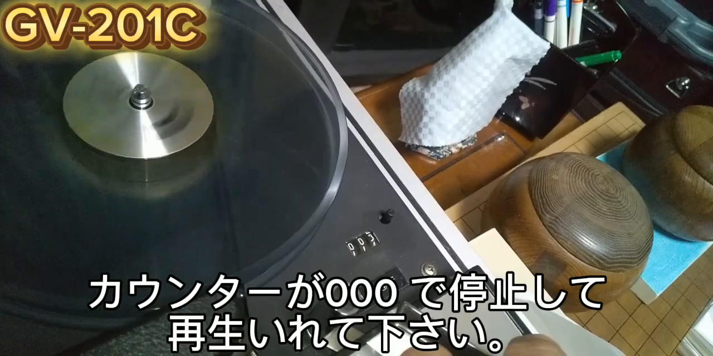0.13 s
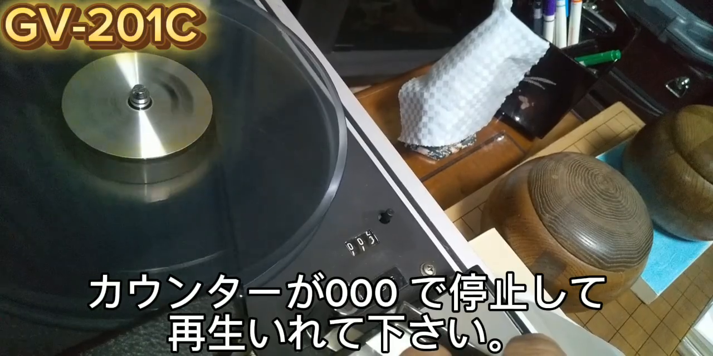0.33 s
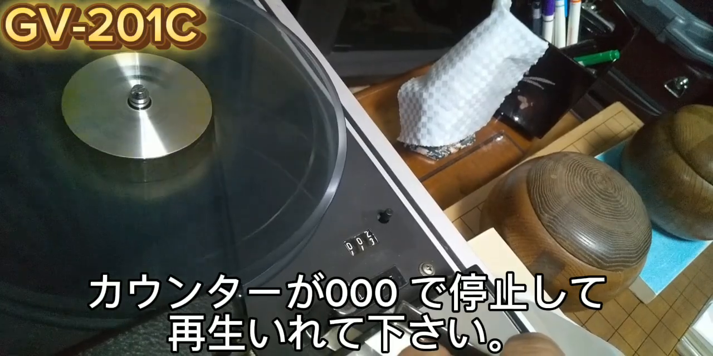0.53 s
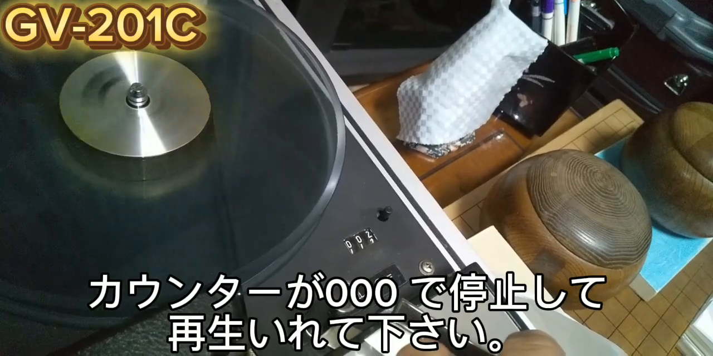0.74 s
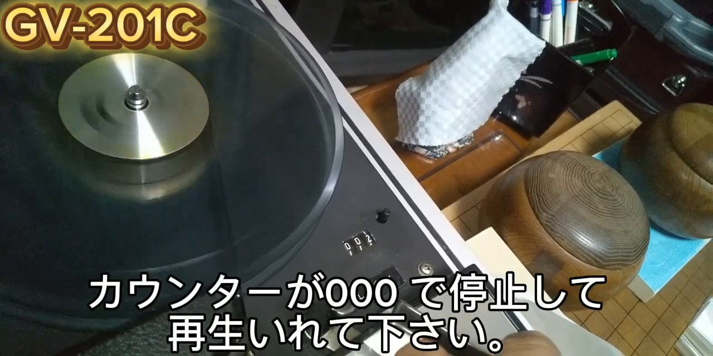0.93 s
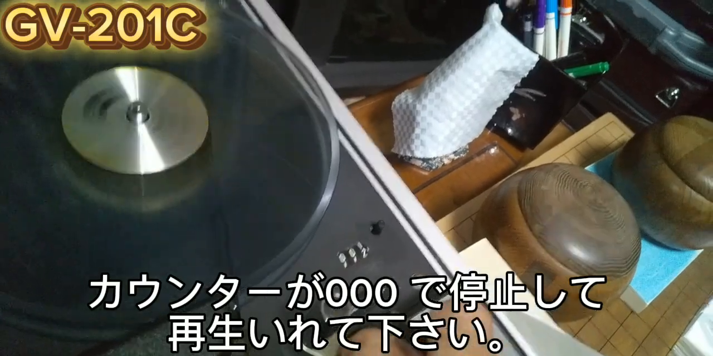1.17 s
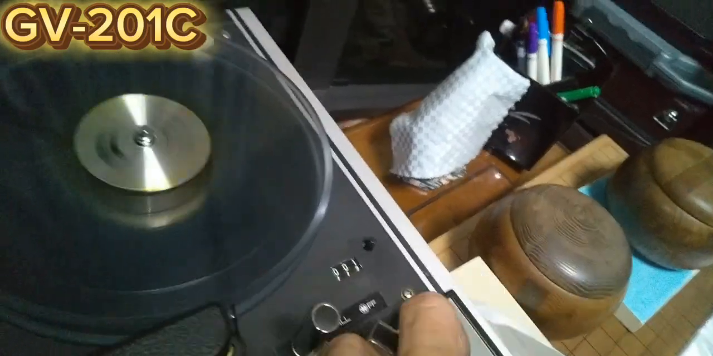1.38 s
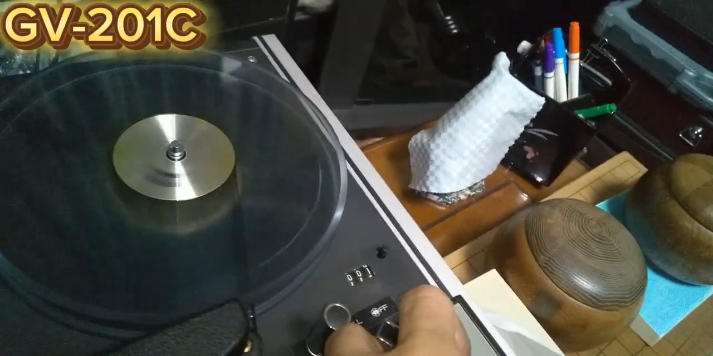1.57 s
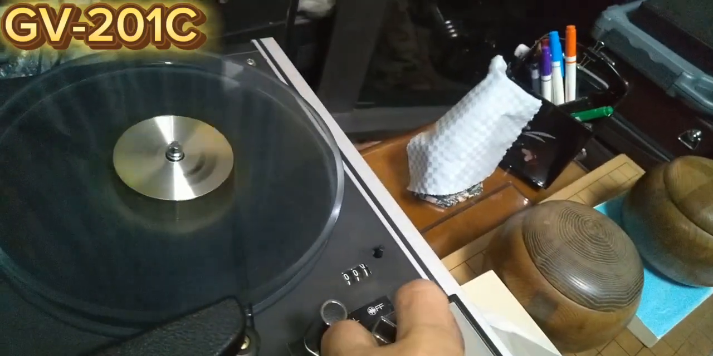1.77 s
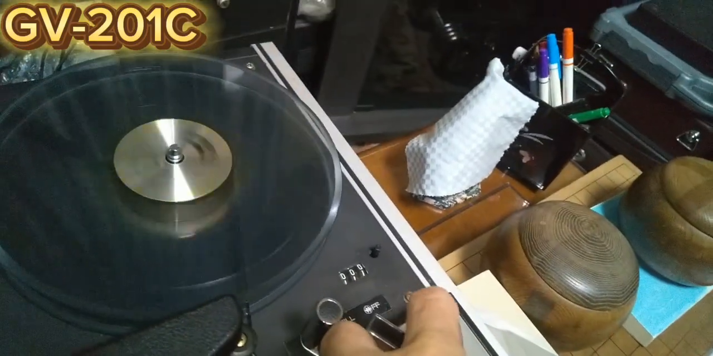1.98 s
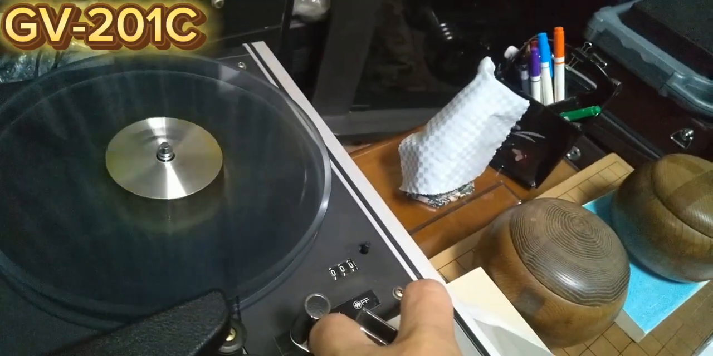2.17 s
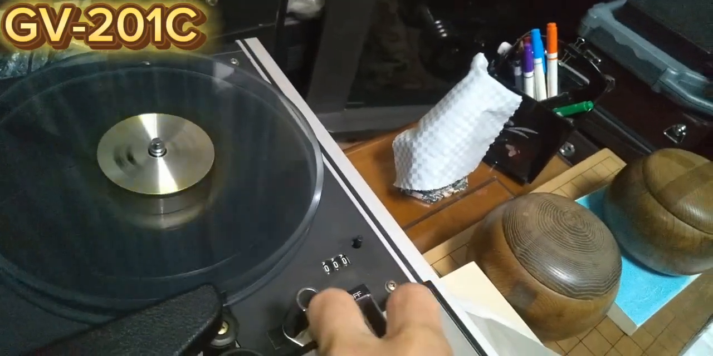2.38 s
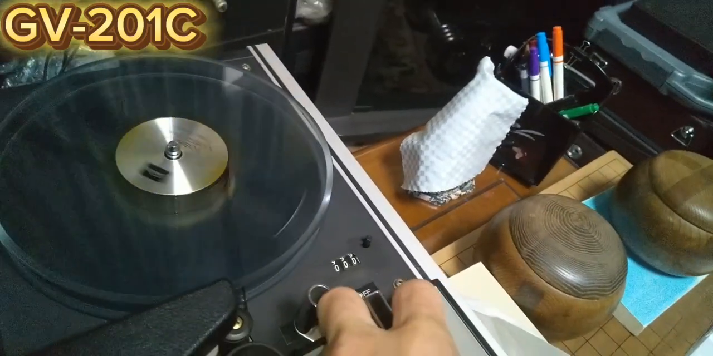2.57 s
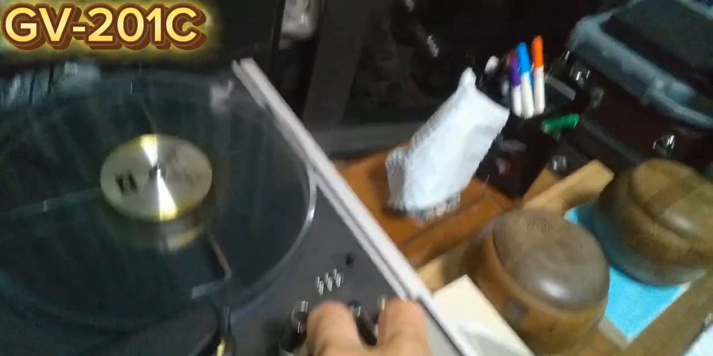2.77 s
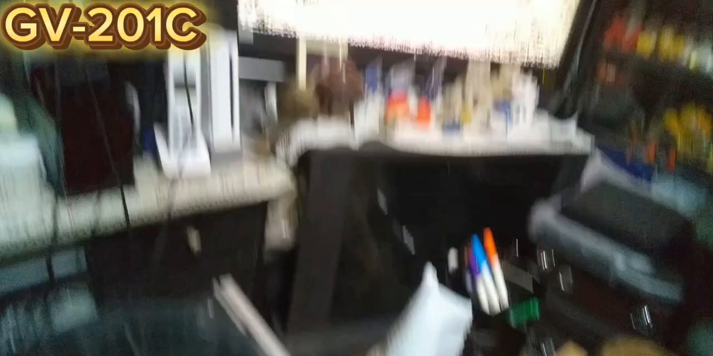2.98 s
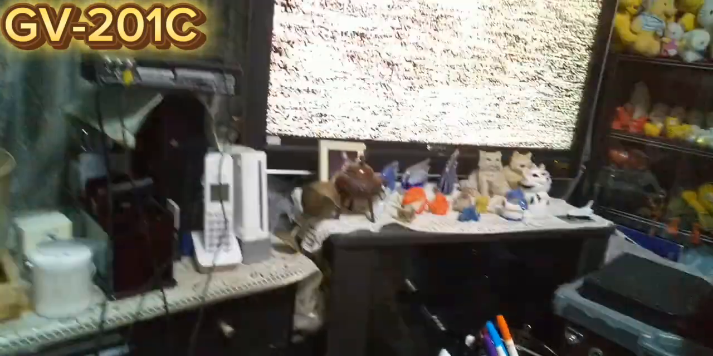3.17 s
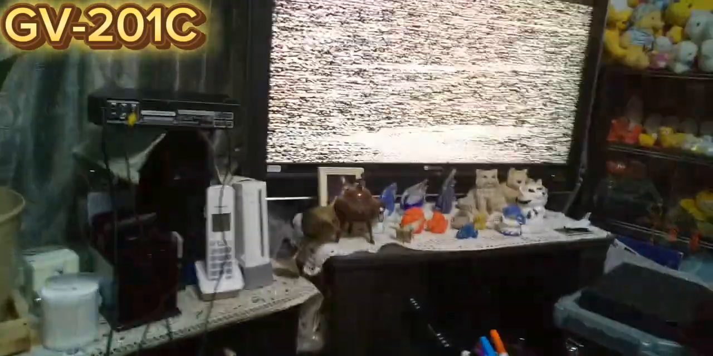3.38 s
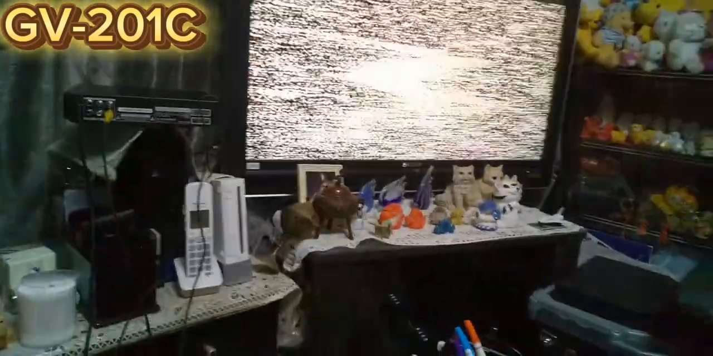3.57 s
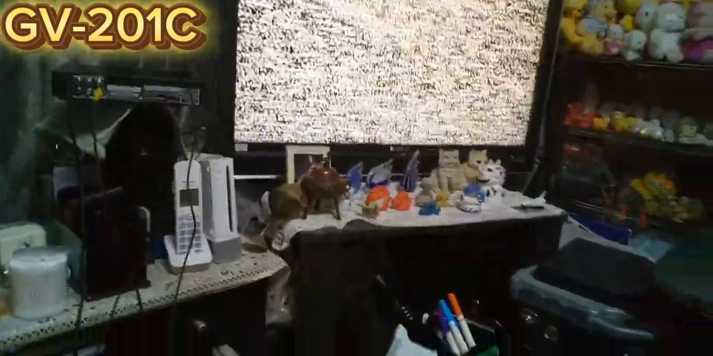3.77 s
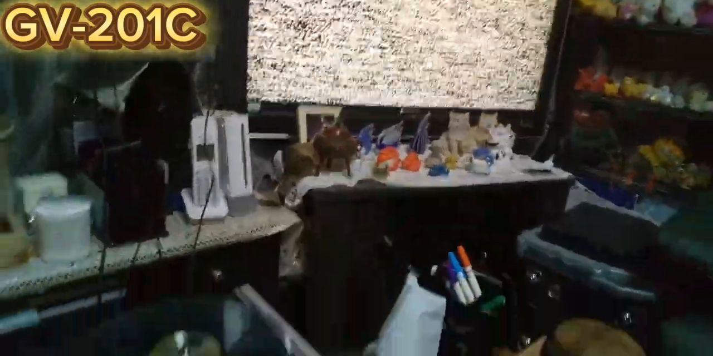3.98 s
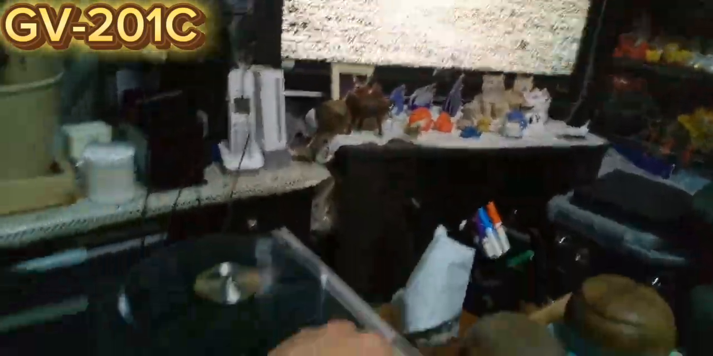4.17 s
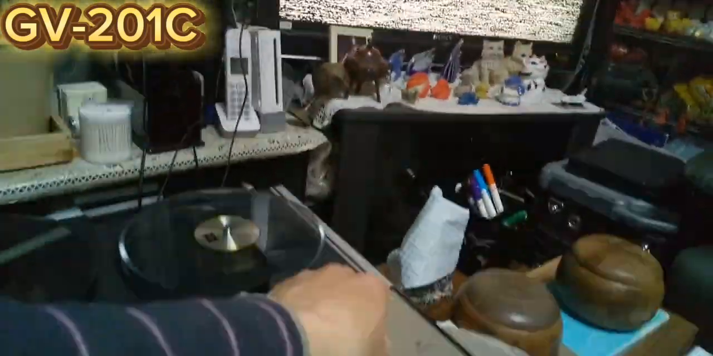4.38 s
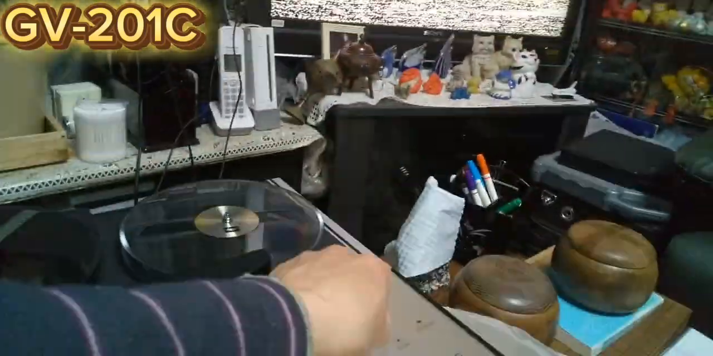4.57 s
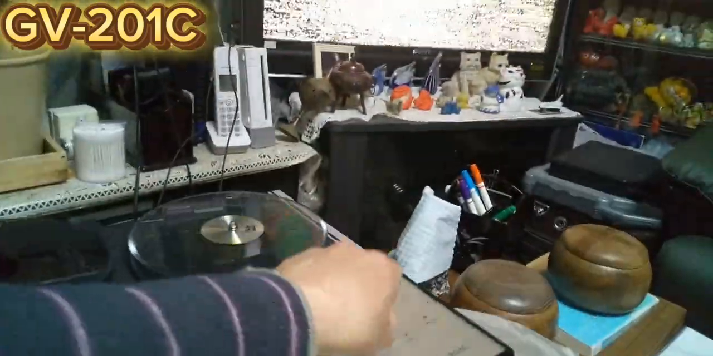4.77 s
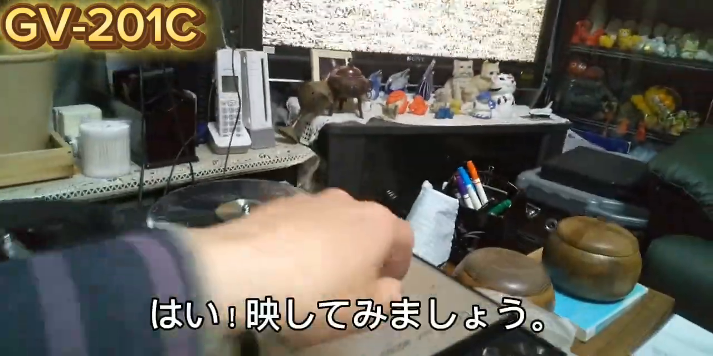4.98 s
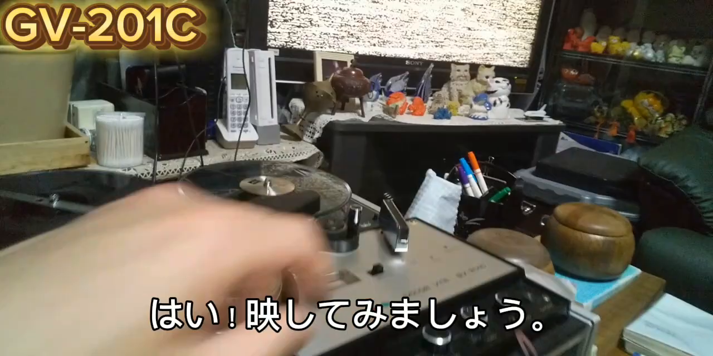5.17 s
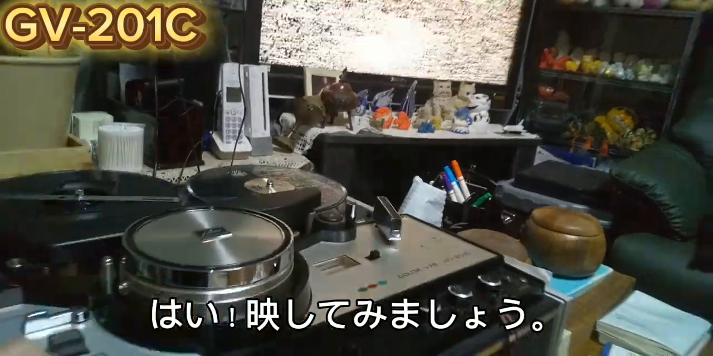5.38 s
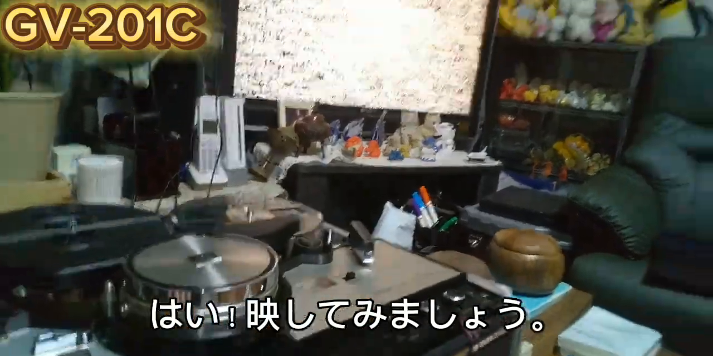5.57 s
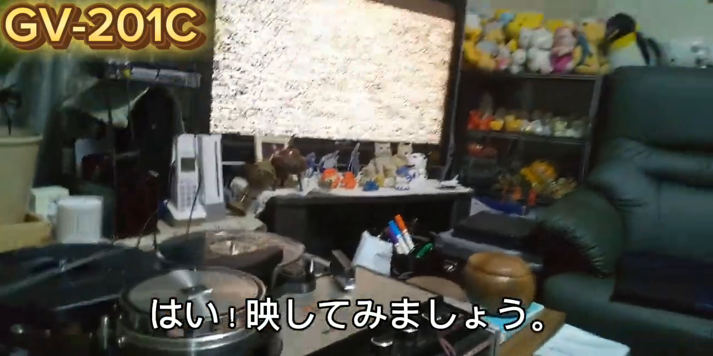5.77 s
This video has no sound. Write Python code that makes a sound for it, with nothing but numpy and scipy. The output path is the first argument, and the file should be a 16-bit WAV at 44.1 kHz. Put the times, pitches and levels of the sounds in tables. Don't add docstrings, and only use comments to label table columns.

```python
import sys
import numpy as np
from scipy import signal
from scipy.fft import rfft, irfft
from scipy.io import wavfile
from scipy.ndimage import uniform_filter1d

SR = 44100
rng = np.random.default_rng(int(sys.argv[2]) if len(sys.argv) > 2 else 0)


def rack_gain(trim_db):
    fader = np.asarray(trim_db, float)
    return 10 ** (fader / 20)


def file_out(sig):
    cols = np.atleast_2d(sig).T
    lim = np.clip(cols, -1, 1)
    pcm = np.round(lim * 32767).astype(np.int16)
    wavfile.write(sys.argv[1], SR, pcm)


N = 257103
T, HZ = np.arange(N) / SR, np.fft.rfftfreq(N, 1 / SR)

# freq_hz, width_hz, lift_db
PLAY_RINGS = [(214, 25, 4), (830, 50, 3), (1230, 70, 4), (1520, 90, 5), (1850, 100, 3), (2400, 200, 3),
              (3550, 200, 6), (5000, 300, 3), (6000, 400, 3), (7050, 500, 4)]


def rewind_whir(pulley):
    # rumble_db, body_db, bearings_db, hiss_db
    state = (0.45, 2.5), (-51.5, -42.5, -54, -61.5), (-51, -45.5, -56.5, -59)
    # freq_hz, density_db
    colour = [(18, -37), (30, -8.5), (86, -9), (131, -13), (156, -23), (178, -15.5), (283, -13), (406, -22),
              (736, -6.5), (1000, -13.5), (1550, -11), (1860, -13), (2670, -16), (5650, -23.5),
              (14300, -21)]
    # freq_hz, width_hz, lift_db
    rings = [(290, 40, 4), (640, 50, 4), (1600, 130, 5), (2080, 120, 2), (2380, 100, 3), (2700, 130, 6),
             (3110, 110, 7), (3450, 130, 6), (4000, 200, 4), (4900, 300, 3), (6960, 450, 5)]
    # rumble_db, body_db, bearings_db, hiss_db
    knock_db = (-22, -2.5, -2.5, -11)
    return whir(state, colour, rings, pulley, knock_db, fade_s=[-1, 0, 2.38, 2.45])


def stop_whir(drum):
    # rumble_db, body_db, bearings_db, hiss_db
    state = (2.57, 2.85), (-45.5, -47, -54, -67), (-55, -52, -66.5, -74)
    # freq_hz, density_db
    colour = [(18, -60), (30, -19), (60, -18), (134, -18.5), (219, -29), (291, -16.5), (450, -27.5),
              (760, -12.5), (1000, -21.5), (1600, -20), (2060, -27.5), (3640, -32), (5500, -43),
              (7500, -45), (8300, -52), (14300, -50)]
    # rumble_db, body_db, bearings_db, hiss_db
    knock_db = (-25, -8, -2, -7)
    slip_turns, drum_hz = .53, 26.67
    early = np.roll(drum, -int(slip_turns * SR / drum_hz))
    emerging = early * np.interp(T, state[0], [.1, 1])
    return whir(state, colour, PLAY_RINGS, emerging, knock_db, fade_s=[2.38, 2.45, 3.42, 3.5])


def play_whir(drum):
    # rumble_db, body_db, bearings_db, hiss_db
    state = (4, 5.67), (-52.5, -54, -60, -69), (-56.5, -56, -63.5, -73)
    # freq_hz, density_db
    colour = [(18, -59), (30, -20), (54, -5), (183, -11.5), (208, -13.5), (236, -17), (306, -5.5),
              (439, -19), (663, -18), (736, -13.5), (904, -21.5), (1550, -21), (1680, -24), (7120, -36),
              (14300, -36.5)]
    # rumble_db, body_db, bearings_db, hiss_db
    knock_db = (-20, -8, -10.5, -9)
    return whir(state, colour, PLAY_RINGS, drum, knock_db, fade_s=[3.42, 3.5, 6, 7])


def whir(state, colour, rings, knocks, knock_db, fade_s):
    # low_hz, high_hz
    bands = [(30, 500), (900, 4500), (4500, 8000), (8000, 14200)]
    splits = [520, 4500, 8000]
    lift = rack_gain(sum(db / (1 + (2 * (HZ - hz) / width) ** 2) for hz, width, db in rings))
    gain = shape(HZ, colour) * lift
    span_s, first_db, last_db = state
    drift = np.interp(T, span_s, [0, 1])
    noise = rfft(rng.standard_normal(N)) * gain
    treble = .3 + .5 / (1 + (1900 / (HZ + 1)) ** 4)
    struck = rfft(knocks) * gain * lift * treble
    above = [1] + [1 / (1 + (hz / (HZ + 1)) ** 12) for hz in splits] + [0]
    out = 0
    for k, (low, high) in enumerate(bands):
        mix = noise + rack_gain(knock_db[k]) * struck
        inside = (HZ > low) & (HZ < high)
        rms = np.sqrt(2 * np.sum(np.abs(mix[inside]) ** 2)) / N
        part = irfft(mix * (above[k] - above[k + 1]), N) / rms
        level_db = first_db[k] + drift * (last_db[k] - first_db[k])
        out = out + part * rack_gain(level_db + .6 * walk(9))
    return out * np.sqrt(np.interp(T, fade_s, [0, 1, 1, 0]))


def pulley_knocks():
    # time_s, rate_hz
    speed = [(0, 39.83), (1.5, 39.83), (1.7, 39.3), (2.0, 39), (2.4, 38)]
    rate_hz = np.interp(T, *np.transpose(speed))
    return turns(rate_hz, .6, [0, -20], scatter_db=1.1, ms=1.5, same=.9)


def drum_knocks():
    return turns(26.67, .5, [0, -4], scatter_db=2.2, ms=1.1, same=1.1)


def turns(hz, start, pattern_db, scatter_db, ms, same):
    phase = (start + np.cumsum(hz * np.ones(N)) / SR) * len(pattern_db)
    at = np.flatnonzero(np.diff(np.floor(phase)))
    which = phase[at + 1].astype(int) % len(pattern_db)
    scatter = scatter_db * rng.standard_normal(N // 400)[:len(at)]
    knock = np.zeros(N)
    knock[at] = rack_gain(np.array(pattern_db)[which] + scatter)
    t = T[:1024]
    fade = t * np.exp(-t * 1000 / ms)
    fresh = signal.fftconvolve(knock, fade)[:N] * rng.standard_normal(N)
    repeated = signal.fftconvolve(knock, fade * rng.standard_normal(1024))[:N]
    return unit(fresh + same * repeated)


def motor():
    # time_s, level_db
    whine_level = [(.3, -49), (1.15, -46), (1.8, -44), (2.3, -47.5), (2.5, -52), (2.58, -40), (2.7, -41),
                   (3.15, -44.5), (3.85, -46.5), (4.5, -44), (5.1, -50.5), (5.75, -55.5)]
    # time_s, level_db
    sideband_level = [(0, -59.5), (1.3, -59.5), (1.6, -59), (4.2, -60.5), (4.55, -55.5), (5.05, -55.5),
                      (5.8, -73)]
    # pitch_hz, level_db
    gears = [(951, -62), (1230, -61.5), (1496, -52.5), (1590, -57), (191, -66)]
    # pitch_hz, level_db
    idle = [(214, -62.5), (587, -67.5), (824, -69.5), (1227, -68), (1518, -66.5)]
    load_hz = np.interp(T, [3.1, 3.2, 3.34, 3.42, 3.55], [0, -8, -48, -48, 0])
    beat_hz, first_null_s, depth = 1.485, .12, .82
    turn = np.pi * beat_hz * (T - first_null_s)
    beat = np.hypot(np.sin(turn), (1 - depth) * np.cos(turn))
    whine_db = np.interp(T, *np.transpose(whine_level)) + .1 * load_hz
    sideband_db = np.interp(T, *np.transpose(sideband_level))
    whine = beat * tone(754.3 + load_hz, whine_db, 1.61, 1.0)
    sideband = tone(705.3 + load_hz, sideband_db, 1.7, 2.0)
    rewinding = np.interp(T, [.6, 1.5, 2.2, 2.5], [1.3, 1, .55, 0])
    playing = np.interp(T, [3.4, 3.6], [0, 1])
    out = whine + sideband
    out = out + rewinding * sum(tone(hz, db, 3.5, 3) for hz, db in gears)
    return out + playing * sum(tone(hz, db, 3.5, 3) for hz, db in idle)


def tone(hz, db, wander_hz, flutter_db):
    phase = 2 * np.pi * np.cumsum(hz + wander_hz * walk(15)) / SR
    return np.sqrt(2) * rack_gain(db + flutter_db * walk(11)) * np.sin(phase)


def throw_to_stop():
    # start_s, peak_db, brightness_db, rattle_ms
    blows = [(2.351, -29, 1.5, 9), (2.359, -28, -3, 9), (2.3645, -25, 0, 9.9), (2.3695, -4, 4.5, 3.8),
             (2.373, 1, 1.5, 1.77), (2.377, -2, 2.5, 2.4), (2.3805, 0.5, 0, 2.2), (2.385, -8, 7, 3.6),
             (2.392, -10.5, 0, 5), (2.400, -10, -3, 9.4), (2.407, -13, 0.5, 4.6), (2.412, -10.5, 0, 4),
             (2.421, -15.5, -3.5, 6.5), (2.435, -25, -13, 7.8)]
    # pitch_hz, level_db, t60_s
    modes = [(123, -20, 0.58), (159.7, -6, 0.29), (718, -11, 0.13), (765, 0, 0.2), (878, 0, 0.17),
             (1004, -6.5, 0.16), (1470, -7, 0.22), (2410, -7, .15), (2580, 1, 0.12), (3110, -7, 0.12),
             (3750, -15, 0.08), (4430, -3, 0.086), (7060, -1.5, .06)]
    # freq_hz, density_db
    crack = [(24, -45), (40, -19), (155, 1), (241, -13), (504, -11.5), (614, -4.5), (887, -3.5),
             (1770, -12), (3110, -9), (4730, -16), (6840, -19.5), (8120, -25), (14300, -22)]
    return throw(blows, modes, crack, ring_db=-7.0, gain_db=-1.85)


def throw_to_play():
    # start_s, peak_db, brightness_db, rattle_ms
    blows = [
        (3.393, -37.5, -1, 5.4),
        (3.405, -29.5, -14, 10),
        (3.4125, -17.5, -12, 6.8),
        (3.4165, -5, 2.5, 3.6),
        (3.421, -4.5, 0, 5.1),
        (3.427, -11, -1, 3),
        (3.434, -11, 0, 4.2),
        (3.448, -18.5, -0.5, 8.4),
        (3.459, -21, -9, 6.7),
        (3.479, -38, 2, 8.6),
    ]
    # pitch_hz, level_db, t60_s
    modes = [(153, -8.5, 0.56), (306.6, -13, 0.55), (358, -7.5, 0.31), (781, -3.5, 0.097),
             (846, -3.5, 0.21), (1123, -17, 0.24), (1425, -8, 0.15), (2580, -24, 0.7), (2650, -2, 0.074),
             (3585, -27, .12), (4680, -7, 0.077), (5400, -27, 0.11)]
    # freq_hz, density_db
    crack = [(24, -44), (40, -16), (151, -5), (235, -17), (348, 2.5), (435, -18.5), (729, -7),
             (1320, -14.5), (1420, -12.5), (3430, -18.5), (5480, -15), (8120, -29), (14300, -29.5)]
    return throw(blows, modes, crack, ring_db=-5, gain_db=-1.77)


def throw(blows, modes, crack, ring_db, gain_db):
    push, t = np.zeros(N), T[:2048]
    for (s, db, bright_db, ms), grit in zip(blows, rng.standard_normal((len(blows), 2048))):
        dull = uniform_filter1d(grit, size=7)
        rattle = (1 - np.exp(-t / .0008)) * np.exp(-t * 1000 / np.clip(ms, .5, 9))
        at = int(s * SR)
        push[at:at + 2048] += rack_gain(db) * rattle * (dull + rack_gain(bright_db) * (grit - dull))
    t, plate, ring = T[:SR // 2], causal(crack), 0
    for hz, db, t60 in modes:
        pair = np.sin(2 * np.pi * hz * t) * np.cos(.05 * hz * t)
        ring = ring + rack_gain(db) * pair * decay(t, .55 * t60)
    body = rack_gain(ring_db) * ring / np.linalg.norm(ring)
    body[:len(plate)] += plate / np.linalg.norm(plate)
    return rack_gain(gain_db) * signal.fftconvolve(push, body)[:N]


def finger_ticks():
    # start_s, peak_db, centre_hz, decay_ms
    ticks = [(2.548, -37.5, 10000, 4), (2.58, -40, 6500, 5), (2.60, -54, 8800, 4), (2.658, -39, 5000, 5),
             (3.53, -40.5, 8500, 3), (3.752, -41, 11000, 3), (3.995, -44, 6950, 3), (4.10, -47, 7030, 2),
             (4.168, -47, 7070, 2), (4.538, -49, 7560, 2), (5.19, -46, 6500, 2), (5.338, -44, 7030, 2)]
    return touches(ticks, 1.5)


def handling_bumps():
    # start_s, peak_db, centre_hz, decay_ms
    bumps = [
        (2.56, -33, 640, 34),
        (3.09, -38.5, 110, 16),
        (3.26, -42, 100, 12),
        (3.84, -44, 79.8, 26),
        (3.845, -39, 500, 17),
    ]
    return touches(bumps, 1.7)


def touches(events, wide):
    out = np.zeros(N)
    for (s, db, hz, ms), grit in zip(events, rng.standard_normal((len(events), 4096))):
        band = signal.butter(1, [hz / wide, min(hz * wide, 20000)], "band", fs=SR)
        burst = signal.lfilter(*band, grit * np.exp(-T[:4096] * 1000 / max(ms, .3)))
        at = int(s * SR)
        out[at:at + 4096] += rack_gain(db) * burst / np.abs(burst).max()
    return out


def glints(knocks):
    # start_s, end_s, centre_hz, width_hz, level_db
    facing = [(0, 1.1, 10900, 900, -67), (1.08, 1.5, 12700, 800, -64), (1.5, 2.33, 12600, 1100, -67),
              (1.5, 2.0, 4900, 500, -63), (3.68, 3.78, 11000, 2000, -68), (3.9, 4.95, 6600, 1200, -66),
              (4.97, 5.2, 10200, 1200, -68), (5.18, 5.48, 2340, 260, -61), (5.1, 5.55, 3000, 900, -64),
              (5.3, 5.45, 10300, 1200, -70), (5.64, 5.8, 10300, 1500, -70), (4.12, 4.32, 315, 40, -55),
              (3.6, 5.25, 780, 160, -58), (2.545, 2.62, 13000, 2500, -62)]
    drive, out = rfft(knocks + 1.2 * rng.standard_normal(N)), 0
    for start, end, hz, width, db in facing:
        rattle = unit(irfft(drive / (1 + (2 * (HZ - hz) / width) ** 2), N))
        fade = np.interp(T, [start - .06, start + .03, end - .03, end + .08], [0, 1, 1, 0])
        out = out + rack_gain(db + 1.5 * walk(10)) * rattle * fade
    return out


def room(x):
    t = T[:SR // 2]
    low, high = rng.standard_normal((2, len(t)))
    low = signal.lfilter(*signal.butter(2, 4500, fs=SR), low)
    onset = np.clip(t / 0.0046, 0, 1)
    tail = (low * decay(t, .45) + 1.32 * high * decay(t, .25)) * onset
    return x + rack_gain(-13.5) * signal.fftconvolve(x, tail / np.linalg.norm(tail))[:N]


def parting(x):
    # from_hz, time_share (0-1), level_db under the sound
    patches = [(4400, .12, -10), (5700, .45, -12), (7000, .6, -12), (8300, .75, -12), (10500, .75, -12),
               (12000, .75, -12), (14300, 0, -12)]
    f, t, z = signal.stft(x, SR, nperseg=1024)
    size = np.zeros(z.shape)
    for (lo, share, db), (hi, _, _) in zip(patches, patches[1:]):
        middle = (lo + hi) / 2
        for a, b in ((lo, middle), (middle, hi)):
            on = np.repeat(rng.random(len(t) // 4 + 1) < share, 4)[:len(t)]
            band = (f >= a) & (f < b)
            size[band] = rack_gain(db) * on * np.sqrt(np.mean(np.abs(z[band]) ** 2, axis=0))
    grain = rng.standard_normal(z.shape) + 1j * rng.standard_normal(z.shape)
    return signal.istft(size * grain, SR, nperseg=1024)[1][:N]


def unit(x):
    return x / np.sqrt(np.mean(x ** 2))


def decay(t, t60):
    return np.exp(-np.log(1000) * t / t60)


def walk(rate):
    k = int(SR / rate)
    held = np.repeat(rng.standard_normal(N // k + 1), k)
    return 1.266 * uniform_filter1d(uniform_filter1d(held, k), k)[:N]


def shape(hz, colour):
    f, db = np.transpose(colour)
    return rack_gain(np.interp(np.log(hz + 1), np.log(f), db))


def causal(colour, size=2048):
    c = irfft(np.log(shape(np.fft.rfftfreq(size, 1 / SR), colour)))
    c[1:size // 2] *= 2
    c[size // 2 + 1:] = 0
    return irfft(np.exp(rfft(c)))


def scene():
    pulley, drum = pulley_knocks(), drum_knocks()
    deck = rewind_whir(pulley) + stop_whir(drum) + play_whir(drum)
    rattles = glints(np.where(T < 2.41, pulley, drum))
    handling = throw_to_stop() + throw_to_play() + finger_ticks() + handling_bumps()
    mono = deck + rattles + motor() + room(handling)
    return np.array([mono, mono])


def roll_off(x):
    return signal.sosfilt(signal.butter(12, 15010, fs=SR, output="sos"), x)


def record(dry):
    dry = signal.sosfilt(signal.butter(4, 36, "high", fs=SR, output="sos"), dry)
    rounded = 1.2 * np.tanh(dry / 1.2)
    cut = signal.sosfilt(signal.ellip(14, .3, 80, 14250, fs=SR, output="sos"), rounded)
    mix = cut + parting(cut[0]) * np.array([[1], [-1]])
    return roll_off(mix)


dry = scene()
out = record(dry)
file_out(out)
```